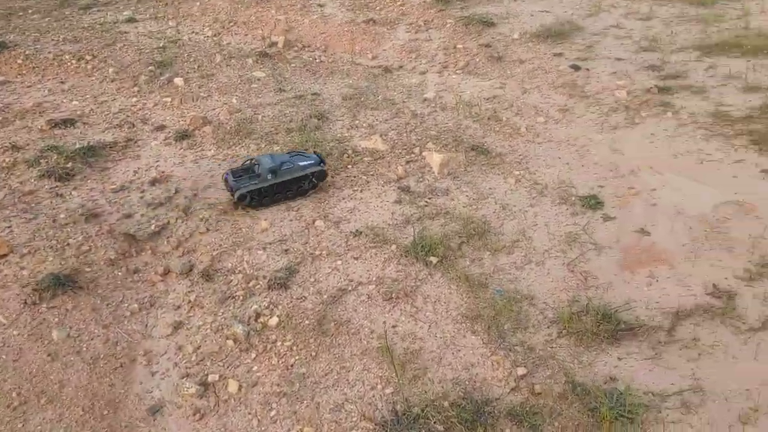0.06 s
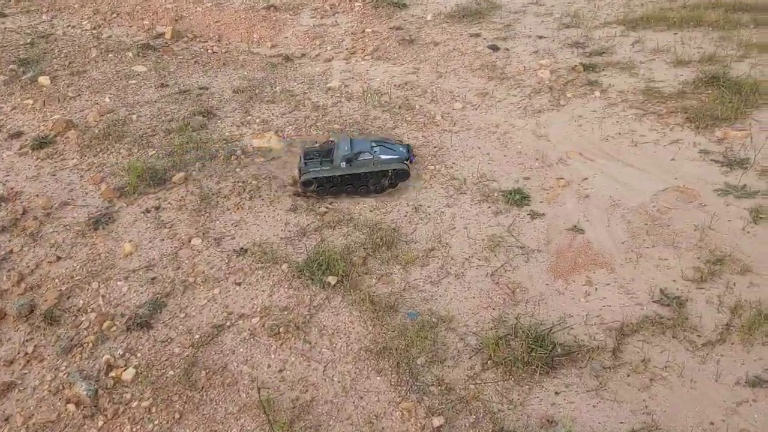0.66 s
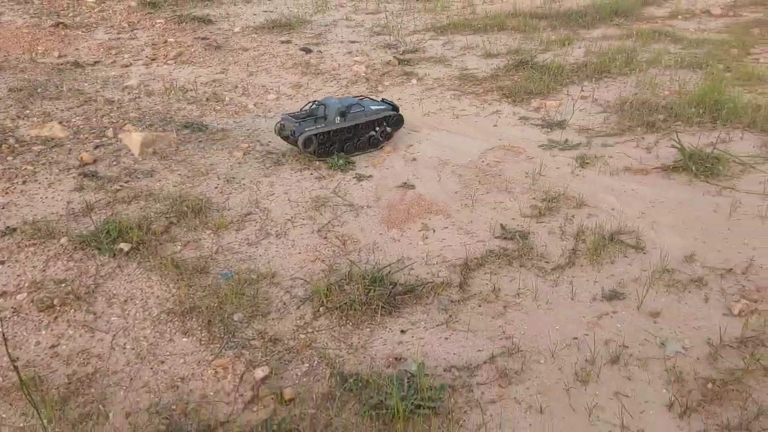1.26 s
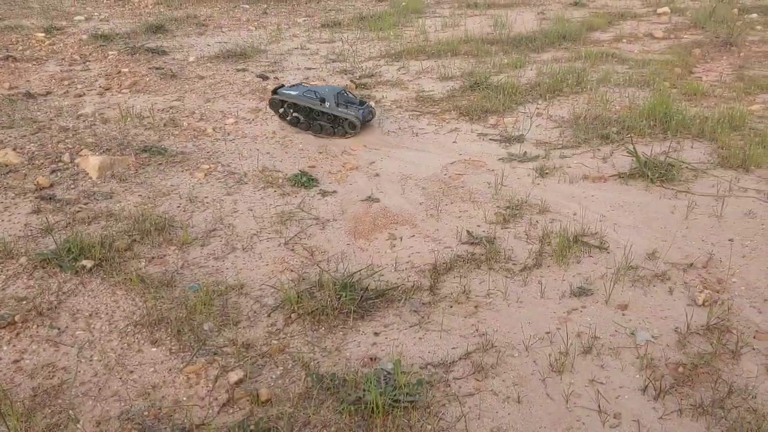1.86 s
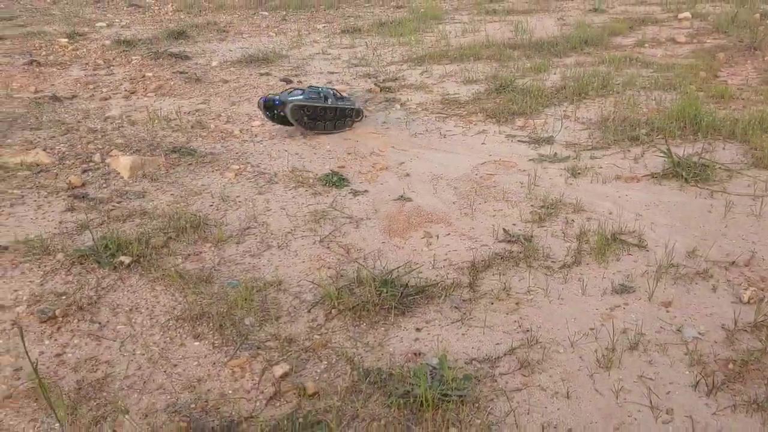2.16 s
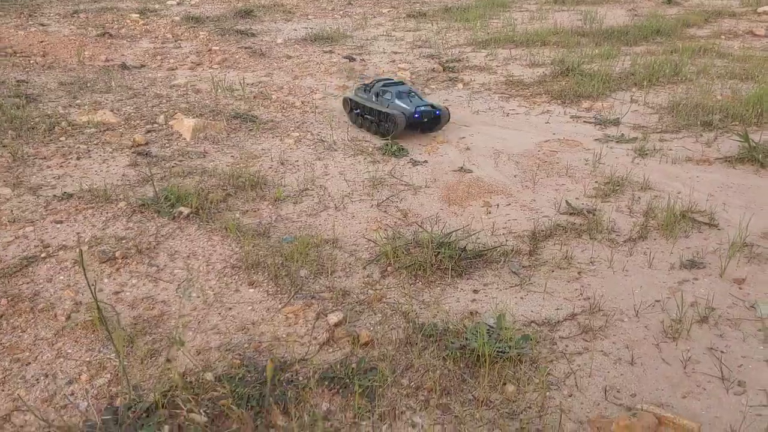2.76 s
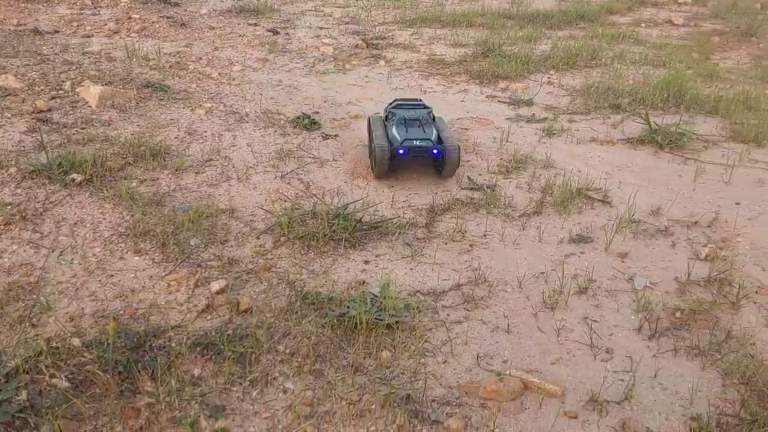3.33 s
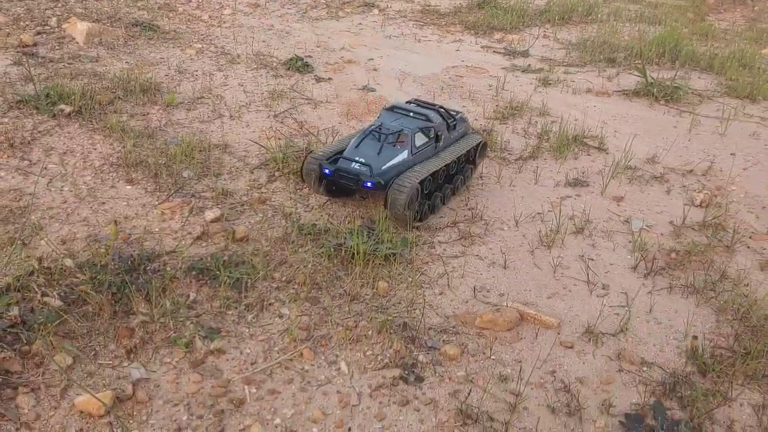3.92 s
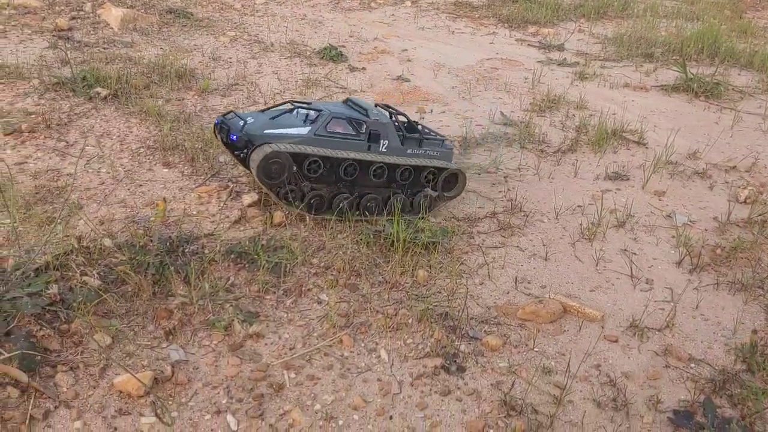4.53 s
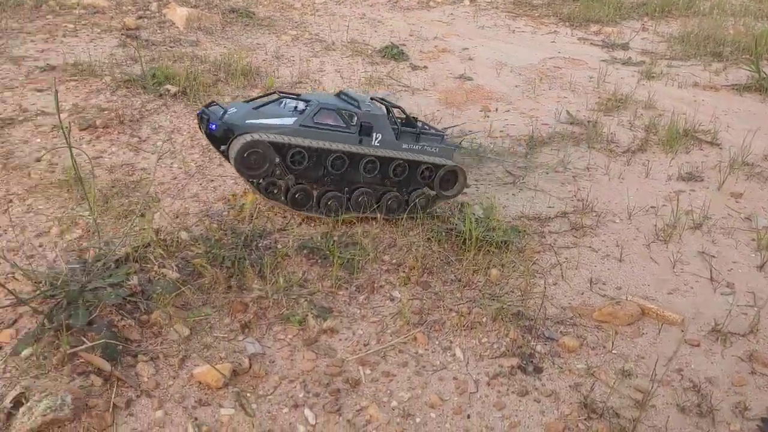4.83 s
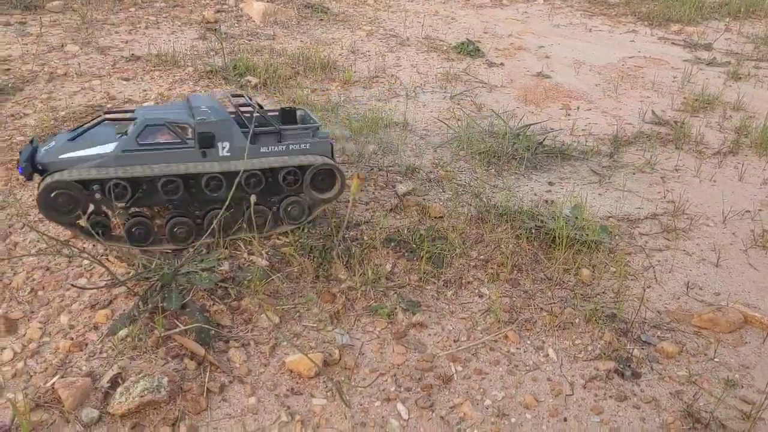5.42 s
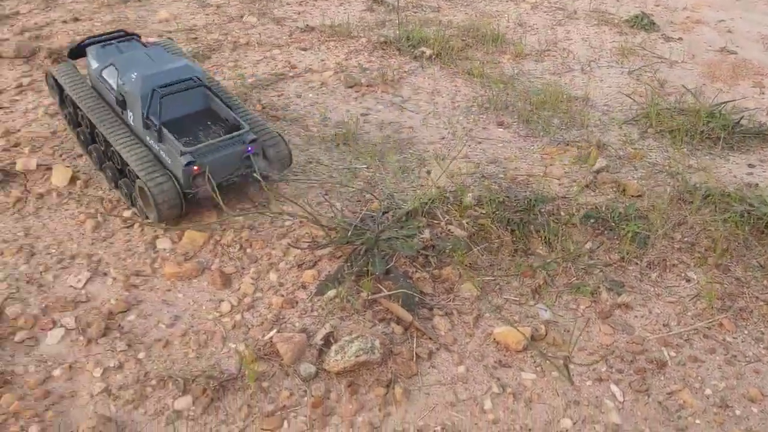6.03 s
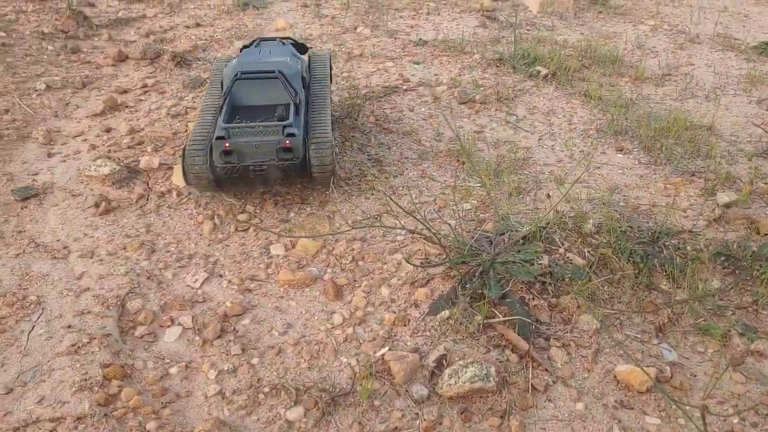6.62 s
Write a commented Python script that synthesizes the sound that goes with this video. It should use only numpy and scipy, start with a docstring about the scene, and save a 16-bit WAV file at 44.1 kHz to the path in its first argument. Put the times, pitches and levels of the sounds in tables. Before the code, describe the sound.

A small remote-controlled tracked vehicle sets off over dry gravel about three metres away, over a faint outdoor rumble. From the start, geared electric motors whine with a wavering pitch, plastic tracks clatter, the hollow body drums and grit crackles. A thin electronic note at one steady pitch comes and goes with the throttle. Pebbles ping against the tracks, and stones snap now and then, first at about 0.8 seconds. The motors slow near 1.3 seconds, then rev in several short spurts. The fastest run lasts from 3 to about 3.8 seconds, dropping away at 4. The vehicle then crawls to within a metre, its gears straining at a lower, uneven pitch. A cluster of pebble clicks comes around 6 seconds, and from about 6.2 seconds the motors wind down as it draws away.

```python
"""A small radio-controlled tracked vehicle sets off over dry gravel, about 3 m away, over a faint rumble.
At once two geared motors whine, plastic track links clatter, the hollow hull drums and grit crackles.
Soon the speed controller sings one steady note, pebbles ring the links and the first stone snaps.
The vehicle moves in short spurts, then makes its fastest run from 3 s. After 4 s it crawls up to 1 m,
its gears straining, and from about 6.2 s the motors wind down as it draws away."""
import sys
import numpy as np
from scipy import signal
from scipy.fft import rfft, irfft, next_fast_len
from scipy.io import wavfile
from scipy.ndimage import uniform_filter1d, map_coordinates

SR = 44100
rng = np.random.default_rng(int(sys.argv[2]) if len(sys.argv) > 2 else 0)


def int16_out(signal):
    """Quantize to a 16-bit WAV file."""
    q = np.round(np.clip(np.atleast_2d(signal).T, -1, 1) * 32767)
    wavfile.write(sys.argv[1], SR, q.astype(np.int16))


N = 294588

# The path over the ground: time_s, distance_m, stoniness_db
ROUTE = [(0, 2.76, 0.5), (.85, 2.55, 1.5), (1.04, 3.27, 9), (1.28, 1.87, -4.5), (1.5, 1.93, 3),
         (1.63, 2.8, 5), (1.7, 2.15, 0.5), (2.0, 2.88, -2), (2.3, 2.85, -2), (2.7, 2.67, 0),
         (2.95, 2.57, -3), (3.1, 2.12, -1.5), (3.5, 2.23, -2), (3.72, 1.85, -3.5), (4.12, 1.93, -6),
         (4.55, 1, -7.5), (5.12, 1.13, -6), (5.45, 1.02, 1.5), (5.6, 1.055, -1), (5.95, 0.97, 1.5),
         (6.13, 1, 4.5), (6.28, 0.97, -0.5), (6.35, 1.5, -10), (6.68, 2.16, -5.5)]
# How the vehicle faces us; its high whine is strongest nose-on:
# time_s, left_delay_ms, whine_over_clatter_db, left_over_right_db
BEARING = [(0, 0.12, -8, 3.5), (.55, 0.11, -9, -1), (1.1, 0.12, -33, 1), (1.6, .14, -11, 0),
           (2.5, .18, -14, 1.5), (3.3, .16, -23, 1), (3.64, .18, -5.5, 1.5), (3.72, .18, -1.5, 0),
           (3.78, 0.13, -15, -1.5), (3.95, 0.2, -18, -0.5), (5.2, .2, -21, 0.5), (5.7, -.12, -40, 1),
           (6.68, -0.077, -15, 2)]
# Spurts of throttle: on_s, off_s, tone_db, overtones_db, rattle_db
SPURTS = [(0, .46, -47.5, -39.5, -36), (.49, .94, -50, -37.5, -35.5), (1.0, 1.11, -45.5, -61, -31),
          (1.44, 1.71, -38.5, -39, -36), (1.89, 2.05, -37.5, -37, -38), (2.28, 2.39, -31, -41.5, -35.5),
          (2.65, 2.93, -45.5, -43.5, -37.5), (3.0, 3.3, -36.5, -43, -44.5), (3.32, 3.77, -35.5, -47, -45),
          (3.87, 3.9, -49.5, -44.5, -42.5), (4.19, 4.46, -38, -42, -50.5), (4.55, 5.02, -36.5, -42, -49),
          (5.13, 5.16, -48, -45, -44), (5.24, 5.44, -39, -49.5, -45), (5.48, 5.62, -42, -44, -40),
          (5.66, 6.17, -42.5, -45.5, -39.5)]
# Jolts over uneven ground: time_s, level_db
JOLTS = [(1.036, -55), (1.679, -66), (2.083, -65), (2.719, -60), (3.034, -66), (3.159, -67), (3.257, -67),
         (3.379, -61.5), (3.569, -65), (3.706, -61), (3.879, -56.5), (4.27, -55), (4.496, -51),
         (4.839, -55), (4.999, -70), (5.176, -55.5), (5.47, -71), (5.829, -71)]
# The tone colour of the plastic links: pitch_hz, level_db
LINK_COLOUR = [(1500, -23.5), (3100, -15.5), (3600, -8.5), (4100, -18), (4700, -16), (5500, -7), (5900, -5),
               (6400, -4.5), (7400, -1), (7900, 4), (8230, -1), (8600, 0.5), (9200, -2.5), (10000, -12.5),
               (11000, -27.5), (15000, -37)]

TEETH, MESH_REF_HZ = 13, 1000  # teeth on a gear; "mesh" is how often teeth meet, here at normal speed
CLATTER_SLOPE_DB = 22.7  # growth for a tenfold speed
JOLT_S = 0.043  # half the length of a jolt


def amp(db):
    """Turn decibels into a gain."""
    return 10 ** (np.asarray(db) / 20)


def unit(x):
    """Scale a signal to an average (rms) level of 1."""
    return x / np.sqrt(np.mean(x ** 2) + 1e-20)


def along(points, hz):
    """Read between (pitch_hz, value) points on a musical (log) scale."""
    pitches, values = np.transpose(points)
    return np.interp(np.log(hz + 1), np.log(pitches + 1), values)


def curves(rows):
    """One value per sample for each column after the time."""
    times, *columns = np.transpose(rows)
    return [np.interp(np.arange(N) / SR, times, column) for column in columns]


def wobble(rate):
    """A smooth random curve that takes rate new values a second."""
    return map_coordinates(rng.standard_normal(int(N * rate / SR) + 4), [np.arange(N) * rate / SR])


def swell(time_s, half_s):
    """A bell-shaped rise and fall of height 1 around time_s."""
    return np.exp(-np.minimum(((np.arange(N) / SR - time_s) / half_s) ** 2 / 2, 20))


def noise(width):
    """Stereo hiss at level 1; more width makes the two sides less alike."""
    return unit(rng.standard_normal(N) + width * rng.standard_normal((2, N)))


def filtered(x, response):
    """Scale each frequency in x by the gain response(hz)."""
    size = next_fast_len(N + SR // 4)
    return irfft(rfft(x, size) * response(np.fft.rfftfreq(size, 1 / SR)), size)[..., :N]


def coloured(x, colour):
    """Ring x through a body with this tone colour; the result has level 1."""
    size = 2048
    cepstrum = irfft(np.log(amp(along(colour, np.fft.rfftfreq(size, 1 / SR)))))
    cepstrum[1:size // 2] *= 2  # folded so that the ringing never comes before the strike
    cepstrum[size // 2 + 1:] = 0
    ring = irfft(np.exp(rfft(cepstrum)))
    return unit(signal.fftconvolve(np.atleast_2d(x), ring[None], axes=1)[:, :N])


def turns(hz):
    """Count the cycles gone by at this rate."""
    return np.cumsum(hz) / SR


def ticks(hz):
    """The samples at which a cycle ends."""
    return np.flatnonzero(np.diff(np.floor(turns(hz))))


def knocks(rate, spread_db, life_s, width):
    """Short noise bursts of uneven size and timing, about rate a second, at level 1."""
    at = ticks(rate * np.exp(.4 * wobble(90)))
    sizes = amp(spread_db * np.clip(rng.standard_normal(len(at)), -2, 2))
    energy = signal.lfilter([1], [1, -np.exp(-2 / (life_s * SR))], np.bincount(at, sizes ** 2, N))
    return unit(np.sqrt(energy / rate) * noise(width))


def mesh_rate():
    """How many gear teeth meet each second as the motors speed up and slow down."""
    # Motor speed, one list for each surge: time_s, mesh_hz
    surges = [
        [(0, 1187), (.12, 987), (.18, 1090), (.25, 1415), (.3, 1324), (.35, 1307), (.4, 1190), (.5, 1486),
         (.56, 1394), (.68, 1530), (.74, 1363), (.81, 1539), (.87, 1319), (.94, 1522), (1.02, 1088),
         (1.2, 1007), (1.33, 557)],
        [(1.41, 539.3), (1.455, 1105), (1.5, 1237), (1.55, 1414), (1.61, 1551), (1.67, 1406), (1.73, 1077),
         (1.82, 686.6)],
        [(1.86, 787), (1.91, 944), (1.945, 1245), (2.01, 1345), (2.06, 860), (2.1, 568.4), (2.21, 380)],
        [(2.245, 618), (2.28, 940), (2.315, 852.6), (2.36, 986), (2.39, 832), (2.43, 551), (2.54, 405)],
        [(2.585, 617.6), (2.62, 941), (2.66, 1111), (2.72, 1066), (2.89, 1091), (2.94, 1219)],
        [(3.0, 1457), (3.06, 1596), (3.15, 1369), (3.2, 1513), (3.26, 1240), (3.31, 1482), (3.36, 1590),
         (3.43, 1468), (3.51, 1435), (3.6, 1622), (3.68, 1523), (3.74, 1375), (3.78, 1065), (3.88, 697.3),
         (3.95, 537.8), (4.08, 260)],
        [(4.19, 340.8), (4.24, 334.8), (4.29, 478), (4.33, 547.7), (4.38, 508), (4.42, 377), (4.47, 378.9),
         (4.52, 502.6), (4.57, 550.4), (4.62, 562.8), (4.68, 587.2), (4.73, 551.2), (4.82, 632.6),
         (4.92, 455.7), (4.98, 511.7), (5.06, 429.5), (5.14, 330.2)],
        [(5.19, 412.5), (5.24, 674.4), (5.29, 596.5), (5.335, 716.6), (5.38, 643.6), (5.41, 748), (5.45, 761),
         (5.52, 921), (5.57, 940.7), (5.68, 642), (5.715, 625.5), (5.8, 688), (5.86, 533.4), (5.92, 644),
         (5.96, 687), (6.01, 602), (6.08, 687.8), (6.12, 832.7), (6.17, 782), (6.21, 651.5), (6.35, 394.2),
         (6.68, 129.9)],
    ]
    return curves([point for surge in surges for point in surge])[0]


def nearness():
    """Sound spreads out and weakens with distance; the gain is 1 at 1 m."""
    return 1 / np.maximum(curves(ROUTE)[0], .1)


def with_speed(slope_db):
    """A gain that grows by slope_db for a tenfold motor speed."""
    return amp(slope_db * np.log10(mesh_rate() / MESH_REF_HZ))


def held(rows, column, rise_db_per_s=162, fall_db_per_s=100):
    """A gain that rises to each row's level by on_s, holds it until off_s, then falls."""
    t = np.arange(N) / SR
    levels_db = [row[column] - rise_db_per_s * np.maximum(row[0] - t, 0)
                 - fall_db_per_s * np.maximum(t - row[1], 0) for row in rows]
    return amp(np.max(levels_db, axis=0))


def strained(column):
    """Gain as the tracks bite and the gears sing out, or slip and the tone breaks."""
    # Bites and slips: time_s, tone_change_db, overtones_change_db
    bites = [(.87, -24, 0), (1.431, 3.5, -4), (1.471, -22, 5.5), (1.58, 5.5, 1), (1.681, 5.5, -23),
             (1.9, 4.5, 6.5), (2.05, 1, -14), (1.99, -4, -16), (2.316, 6, 6), (2.6, 21.5, 4),
             (2.628, 16, -5), (2.94, -3, 12), (3.251, 4, 1), (3.501, 3.5, -16), (3.68, 2, 10),
             (3.779, -7, 7), (3.879, 17.5, 7), (4.331, 6, 6), (4.68, 3.5, 1), (4.735, -1, -0.5),
             (4.8, -1, -8), (4.875, 3, 2.5), (4.975, 0, 3.5), (5.01, 4, 2), (5.25, 2.5, 5), (5.335, 4, 7),
             (5.42, 3, 4), (5.52, 7, -12), (5.565, 5, 1.5), (5.801, 6.5, -3), (5.865, -14, 4.5),
             (6.03, -1, -8), (6.085, -10, -8), (6.115, 4, 6.5), (6.16, 6.5, 0)]
    return amp(sum(row[column] * swell(row[0], half_s=.011) for row in bites))


def clatter():
    """The gain of the tracks, which grow louder with speed and on stony ground."""
    return amp(-34.5 + curves(ROUTE)[1]) * with_speed(CLATTER_SLOPE_DB)


def motor(mesh_hz, tone_gain, overtone_gain, jitter, flutter_db, rasp_db, rasp, sway):
    """Teeth meet in a tone with rasping overtones, louder at the pitches where the housing rings."""
    # How well the gear housing gives off a tone: pitch_hz, gain_db
    housing = [(350, -30), (520, -19), (575, -5), (640, 2.5), (780, -3), (900, 1), (1000, 1.5), (1090, 3.5),
               (1250, -9), (1450, 3.5), (1650, -5.5), (1880, 2.5), (2130, -2.5), (2550, 7.5), (3000, -5.5),
               (3400, -11.5), (4300, -8.5), (5200, -24), (5900, -9), (6700, 16)]
    # Overtones of the gear tone: mesh_multiple, level_db
    overtones = [(2, 0), (3, -9), (4, -11), (5, -16)]
    labour = np.clip(MESH_REF_HZ / mesh_hz, .5, 1.3)  # slow, straining motors run less evenly
    phase = 2 * np.pi * turns(mesh_hz * (1 + labour * jitter * wobble(220) + .003 * wobble(35)))
    phase += labour * sway * np.sin(phase / TEETH)  # an off-centre gear sways once a turn
    flutter = amp(labour * flutter_db * wobble(90))
    tone = amp(along(housing, mesh_hz)) * unit(flutter * np.sin(phase))
    bounce = np.clip(mesh_hz / 1200, .55, 1)  # faster teeth bounce more and break up the overtones
    rasping = np.zeros(N)
    for multiple, db in overtones:
        flicker = amp(bounce * rasp_db * np.tanh(wobble(110)))
        wave = np.sin(multiple * phase + bounce * rasp * wobble(260))
        rasping += amp(db + along(housing, multiple * mesh_hz)) * unit(flicker * wave)
    return tone_gain * tone + overtone_gain * rasping


def motors():
    """One motor drives each track; the far one is fainter and drifts off the near one's speed."""
    mesh_hz = mesh_rate()
    unload_db_per_s = 211  # the tones die as soon as the teeth stop pushing
    tone_gain = held(SPURTS, column=2, fall_db_per_s=unload_db_per_s) * strained(column=1)
    overtone_gain = held(SPURTS, column=3, fall_db_per_s=unload_db_per_s) * strained(column=2)
    near = motor(mesh_hz, tone_gain, overtone_gain,
                 jitter=.003, flutter_db=1.8, rasp_db=5.5, rasp=.85, sway=.17)
    far = motor(mesh_hz * (1 + .04 * wobble(5)), tone_gain, overtone_gain,
                jitter=.006, flutter_db=2, rasp_db=5, rasp=.9, sway=.25)
    return amp(2) * near + amp(-11) * far


def tooth_strikes(mesh_hz, wear, jitter):
    """One click for each tooth; worn teeth repeat their loud and soft pattern every turn."""
    rate = mesh_hz * (1 + jitter * wobble(200))
    count, at = turns(rate), ticks(rate)
    late = (np.ceil(count[at]) - count[at]) * SR / rate[at]  # where a click falls between two samples
    # the pattern slowly changes as the gears shift on their shafts
    pattern = unit(uniform_filter1d(rng.standard_normal((len(at) // TEETH + 1, TEETH)), size=8, axis=0))
    sizes = (1 + wear * pattern.ravel()[:len(at)]) / np.sqrt(rate[at])
    return unit(np.bincount(at, sizes * (1 - late), N) + np.bincount(at + 1, sizes * late, N))


def gearbox():
    """Teeth buzz and rattle in the plastic housing; at speed their high overtones whine roughly."""
    # The tone colour of the gearbox: pitch_hz, level_db
    gear_colour = [(700, -21), (1100, 2.5), (1400, 3), (1700, -4), (1950, 6.5), (2450, 5.5), (2800, -3.5),
                   (3300, -8.5), (4300, -17), (6000, -13.5), (12000, -79)]
    # The overtones that whine: mesh_multiple, level_db
    high_overtones = [(4, -8), (5, 0), (6, -4)]
    mesh_hz = mesh_rate()
    loaded = held(SPURTS, column=4) * with_speed(slope_db=2.6) * strained(column=2) ** 0.053
    coasting = amp(-46) * with_speed(CLATTER_SLOPE_DB)
    rattle = coloured(knocks(mesh_hz / 4, spread_db=5.5, life_s=0.026, width=1.0), gear_colour)
    buzz = coloured(tooth_strikes(mesh_hz, wear=2.2, jitter=.003), gear_colour)
    phase = 2 * np.pi * turns(mesh_hz)
    overtones = sum(amp(db + 3 * wobble(120)) * np.sin(multiple * phase + 1.9 * wobble(520))
                    for multiple, db in high_overtones)
    whine_db = curves(BEARING)[1] - 3.5
    whine = clatter() * amp(whine_db) * coloured(overtones, LINK_COLOUR)
    return (loaded + coasting) * (amp(-5) * rattle + amp(-6.5) * buzz) + whine


def link_rings(at, sizes):
    """A struck link rings at each sample in at, with its own pitch and mix of notes."""
    # The notes a link rings with: pitch_hz, level_db, ring_s (time to fade by 60 dB)
    link_notes = [(5900, -10, .012), (7450, -12, .01), (8230, 0, .018), (8480, -6, .013), (9050, -11, .01)]
    t = np.arange(SR // 60) / SR
    draws = rng.standard_normal((len(at), len(link_notes), 4, 1))
    rings = np.zeros((2, len(at), len(t)))
    for (hz, db, ring_s), (detune, extra_db, *phases) in zip(link_notes, draws.transpose(1, 2, 0, 3)):
        wave = np.sin(2 * np.pi * hz * (1 + .012 * detune) * t + np.pi * np.array(phases))
        rings += amp(db + extra_db - 60 * t / ring_s) * wave
    rise = 1 - np.exp(-t / .0004)
    where = (at[:, None] + np.arange(len(t))).ravel()
    return np.array([np.bincount(where, (sizes[:, None] * rise * ear).ravel(), N)[:N] for ear in rings])


def tracks():
    """Links slap the wheels and ping, more so on stony ground, over a steady scrape."""
    link_hz = mesh_rate() / 7
    grip = amp(1.6 * wobble(30))  # uneven ground grips and lets go
    slaps = coloured(knocks(link_hz, spread_db=4, life_s=.003, width=1.0), LINK_COLOUR)
    at = ticks(link_hz * np.exp(.5 * wobble(90)))
    sizes = amp(4.5 * np.clip(rng.standard_normal(N)[at], -2, 1.6))
    stoniness_db = curves(ROUTE)[1]
    pings = amp(-7.5 + 0.15 * stoniness_db) * unit(link_rings(at, sizes))
    scrape = coloured(noise(width=0.97), LINK_COLOUR)
    return clatter() * grip * (amp(-8.5) * slaps + pings + amp(-7.5) * scrape)


def hull():
    """The hollow hull drums and buzzes with the gears as it rolls, and swells at each jolt."""
    # The tone colour of the hull: pitch_hz, level_db
    hull_colour = [(200, -29.5), (340, -12), (440, -1), (510, -3.5), (620, 7), (770, 0), (850, -2),
                   (1090, 9), (1250, -14), (1700, -4.5), (3500, -59.5)]
    jolts = sum(amp(db + 8.5) * swell(time_s, JOLT_S) for time_s, db in JOLTS)
    rolling = amp(-45) * with_speed(slope_db=23.5) * nearness() ** 0.98
    drumming = knocks(mesh_rate() / 9, spread_db=8.0, life_s=0.026, width=0.42)
    buzz = tooth_strikes(mesh_rate(), wear=3, jitter=0.0018)
    return (rolling + jolts) * coloured(drumming + buzz, hull_colour)


def shell(x):
    """The plastic body rings at many close pitches, so gliding tones swell and break."""
    # How long the body rings: pitch_hz, ring_s (time to fade by 60 dB)
    ring_times = [(200, 0.11), (1000, 0.25), (2500, 0.05), (8000, 0.037)]
    # The ringing against the direct sound: pitch_hz, level_db
    ring_levels = [(400, 1), (700, -8), (1400, -7.5), (2200, -7), (4000, 5.5), (8000, 1)]
    hop = int(.3 * SR)  # every 0.3 s the body turns a new side to the ear
    ring = np.zeros((2, N + SR))
    padded = np.pad(x, ((0, 0), (hop, 2 * hop)))
    fade = np.sin(np.pi * np.arange(2 * hop) / (2 * hop))
    for start in range(0, N + hop, hop):
        hz, t, bands = signal.stft(rng.standard_normal((2, SR // 6)), SR, nperseg=256)
        decay = amp(-60 * t / along(ring_times, hz)[:, None])
        bands = bands * decay / np.linalg.norm(decay, axis=1, keepdims=True)
        tail = unit(signal.istft(bands, SR, nperseg=256)[1])
        piece = padded[:, start:start + 2 * hop] * fade
        rung = signal.fftconvolve(piece, tail / np.sqrt(tail.shape[1]), axes=1)[:, :N + SR - start]
        ring[:, start:start + rung.shape[1]] += rung
    return amp(-2.0) * (x + filtered(ring[:, hop:], lambda hz: amp(along(ring_levels, hz))))


def outdoors():
    """A low rumble with a wavering hum, thin air noise and a breeze brushing the microphone."""
    # The background over time: time_s, rumble_db, hum_db
    levels = [(0, -66.5, -61), (.6, -60.5, -75), (1.3, -59, -57.5), (1.75, -64.5, -70), (1.95, -53.5, -54),
              (2.6, -52, -75), (3.33, -50, -57), (4.1, -54.5, -63.5), (5.85, -54, -57), (5.98, -53.5, -57),
              (6.05, -57, -48), (6.13, -60, -48), (6.22, -59.5, -62), (6.32, -56, -56), (6.39, -57.5, -47),
              (6.48, -53.5, -61), (6.57, -58, -53), (6.68, -56.5, -54)]
    # The tone colours of rumble, air and breeze: pitch_hz, level_db
    rumble_colour = [(20, -34), (40, 2), (65, -1), (110, 3), (160, 6.5), (220, -0.5), (300, -5.5),
                     (450, -9.5), (900, -32)]
    air_colour = [(100, -6), (400, -3), (1000, -7), (2000, -5), (3000, -13), (8000, -6), (11000, -26),
                  (15000, -50)]
    breeze_colour = [(20, -16.5), (36, 1.0), (60, -17.0), (130, -14), (500, -76)]
    rumble_db, hum_db = curves(levels)
    phase = 2 * np.pi * turns(78 * (1 + 0.0597 * wobble(10)))
    hum = amp(hum_db + 0.5 + 1.3 * wobble(4.5)) * np.sin(phase)
    hum += amp(rumble_db - 8.5 + 1.9 * wobble(2.8)) * np.sin(2 * phase)
    rumble = amp(rumble_db - 1.5) * coloured(noise(width=0.94), rumble_colour)
    breeze = amp(-66 + 4 * wobble(4.07)) * coloured(noise(width=0.88), breeze_colour)
    air = amp(-66) * coloured(noise(width=1), air_colour)
    return rumble + hum + breeze + air


def gravel():
    """Fine grit crackles under the tracks; now and then a stone snaps against a link and crumbles."""
    # The tone colour of grit: pitch_hz, level_db
    grit_colour = [(1000, -5), (3000, 0), (7000, -1), (10000, 4), (15000, -12)]
    # Stones that crack: start_s, link_ring_db, sharp_snap_db
    stones = [(0.82, -29, -53), (0.8714, -35, -49), (1.405, -25, -54), (1.5363, -30, -54),
              (2.476, -31, -60), (2.675, -18, -59), (3.147, -34, -51), (4.7117, -27, -61),
              (5.1791, -34, -53), (5.8046, -21, -50), (5.9098, -38, -59), (6.0736, -28, -47),
              (6.4338, -32, -60)]
    t = np.arange(SR // 20) / SR
    ring, snap = np.zeros((2, N + SR)), np.zeros((2, N + SR))
    for start_s, ring_db, snap_db in stones:
        crumbs = np.repeat(rng.exponential(size=len(t)), 40)[:len(t)]
        shape = .7 * np.exp(-t / .0015) + .2 * crumbs * np.exp(-t / .018)
        burst = rng.standard_normal((2, len(t))) * shape
        span = slice(round(start_s * SR), round(start_s * SR) + len(t))
        ring[:, span] += amp(ring_db - 10) * burst
        snap[:, span] += amp(snap_db + 15.5) * burst
    rings = np.std(ring[:, :N]) * coloured(ring, LINK_COLOUR)
    snaps = np.std(snap[:, :N]) * coloured(snap, grit_colour)
    crackle = coloured(knocks(np.full(N, 160.), spread_db=5, life_s=.0006, width=.5), grit_colour)
    return rings + snaps + amp(-39) * (clatter() * nearness()) ** 0.72 * crackle


def controller():
    """At part throttle the current is chopped on and off, so the motor coils sing one steady note."""
    # Spells of part throttle: on_s, off_s, level_db
    part_throttle = [(.17, 1.1, -49), (1.41, 1.58, -46), (1.9, 2.06, -41), (2.29, 2.39, -43),
                     (2.61, 2.93, -42.5), (3.09, 3.85, -42.5), (4.14, 4.7, -43), (4.72, 5.54, -43),
                     (5.82, 6.05, -42.5)]
    chop_hz = 990.5
    note = np.sin(2 * np.pi * chop_hz * np.arange(N) / SR)
    return held(part_throttle, column=2) * amp(-1.0 + 3.6 * wobble(30)) * note


def pebbles():
    """Pebbles strike the links and ring them hard."""
    # Pebble strikes: start_s, level_db
    strikes = [(.297, -26), (.674, -29), (.720, -23.5), (.728, -20), (.850, -28), (.904, -26), (.947, -38),
               (1.016, -28), (1.048, -24), (1.182, -24.5), (1.441, -29), (1.546, -24), (1.602, -25),
               (1.679, -31), (2.708, -19), (2.893, -29), (2.941, -33), (3.109, -21), (3.222, -23),
               (3.236, -22.5), (3.387, -20), (3.428, -20.5), (3.474, -19), (4.799, -28.5), (5.866, -23.5),
               (6.09, -20), (6.134, -22), (6.159, -29), (6.183, -37), (6.198, -23), (6.212, -33),
               (6.219, -21)]
    start_s, level_db = np.transpose(strikes)
    return link_rings(np.round(start_s * SR).astype(int), amp(level_db + 1))


def placed(x):
    """The vehicle's direction makes its sound later or softer in one ear than in the other."""
    lag_ms, _, pan_db = curves(BEARING)
    lag = lag_ms * SR / 1000
    return np.array([amp(-side * pan_db / 2) * map_coordinates(ear, [np.arange(N) + side * lag / 2])
                     for ear, side in zip(x, (-1, 1))])


def scene():
    """The moving vehicle in open country; each jolt shakes its gears and tracks harder."""
    shaken = amp(2 * sum(swell(time_s, JOLT_S) for time_s, _ in JOLTS))
    drive = motors() + shaken * (gearbox() + tracks())
    body = shell(nearness() * drive + hull())
    return placed(body + nearness() * controller() + gravel() + pebbles()) + outdoors()


def record(dry):
    """Two close microphone openings hear the bass nearly alike, but each has its own tone colour."""
    # How the two openings differ: pitch_hz, left_over_right_db
    balance = [(400, 0), (700, -1.5), (1000, 0), (1450, 6.5), (2100, 13.5), (2500, 8.5), (3000, -5.5),
               (3500, -2), (4300, -4), (5550, -7), (6100, -3.5), (7500, -9.5), (8500, 8.5), (11000, -4)]
    # Stereo width: pitch_hz, side_db
    width = [(600, -7), (1000, -10.5), (1600, 0)]
    top_hz = 15600

    def openings(hz):
        """Left and right gains with a steady total power, and silence above top_hz."""
        gains = amp(along(balance, hz) * np.array([[.5], [-.5]]))
        return gains / np.sqrt(np.mean(gains ** 2, axis=0)) * (hz < top_hz)
    mid = dry.mean(axis=0)
    side = filtered(dry - mid, lambda hz: amp(along(width, hz)))
    return filtered(mid + side, openings)


dry = scene()
out = record(dry)
int16_out(out)
```